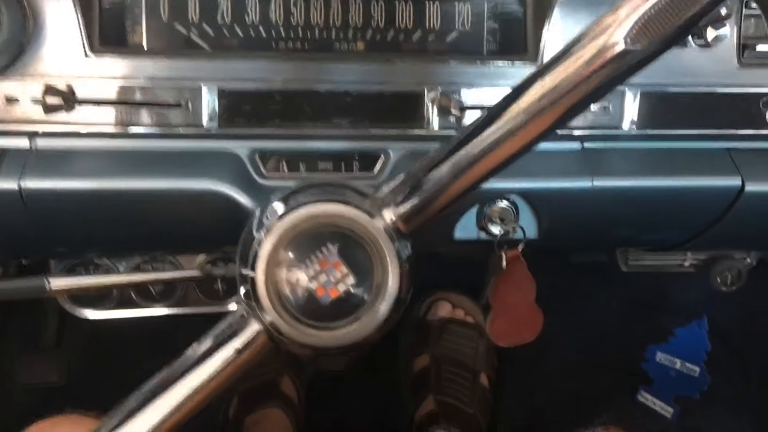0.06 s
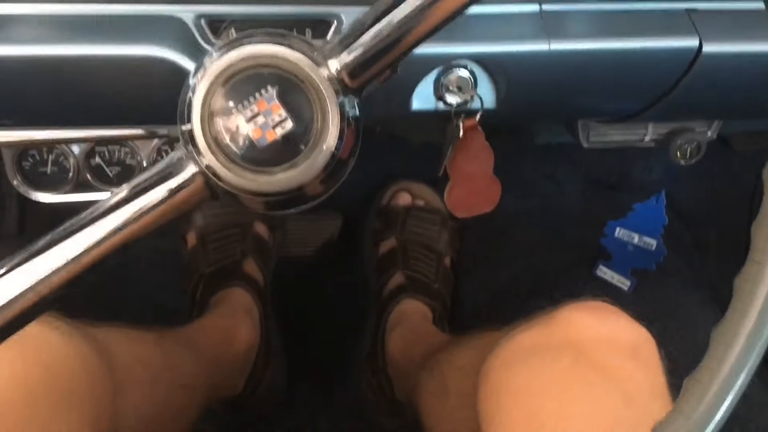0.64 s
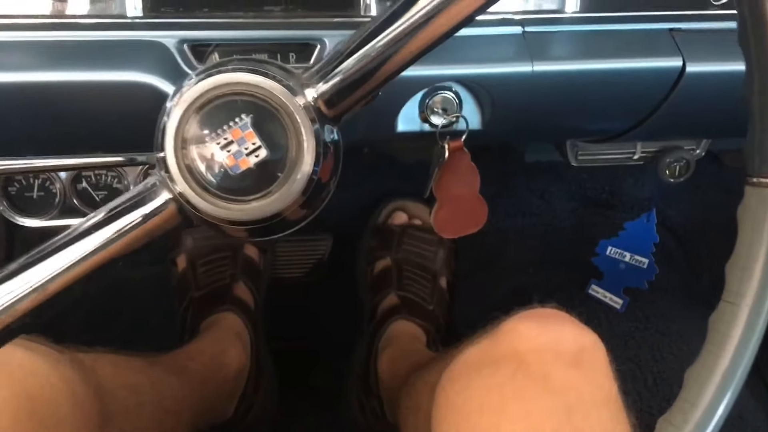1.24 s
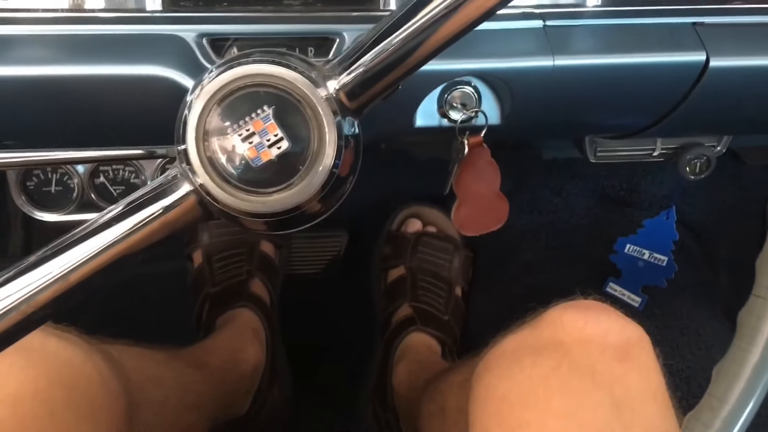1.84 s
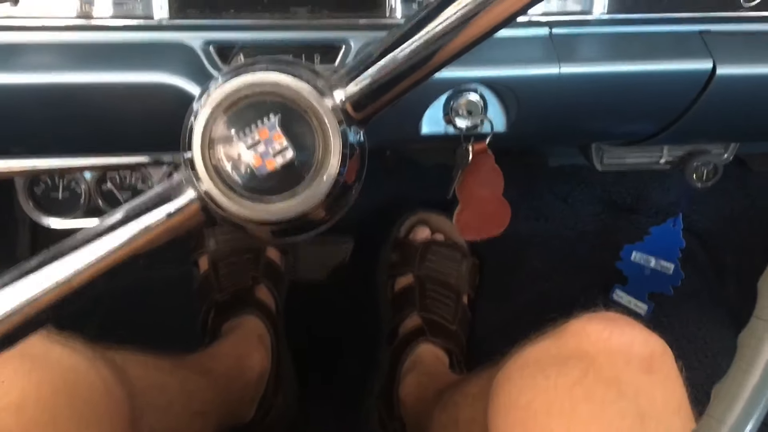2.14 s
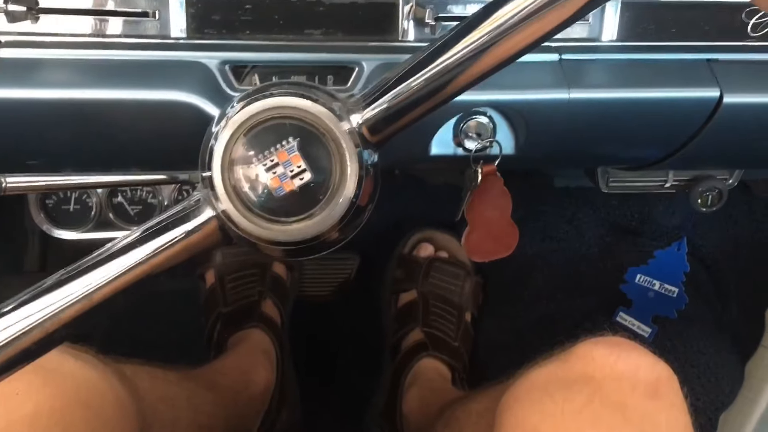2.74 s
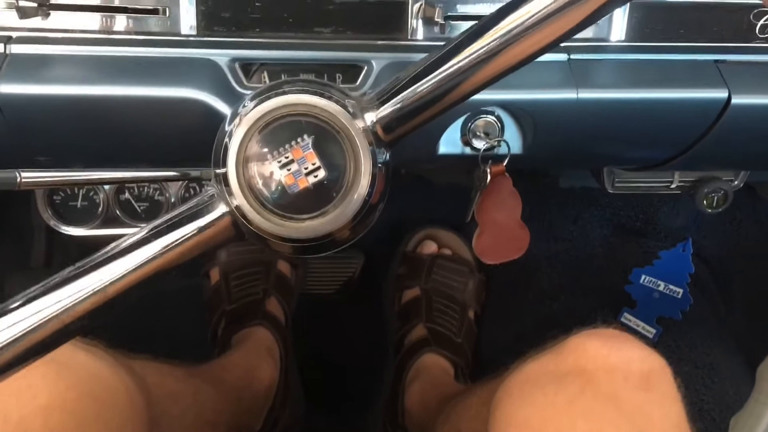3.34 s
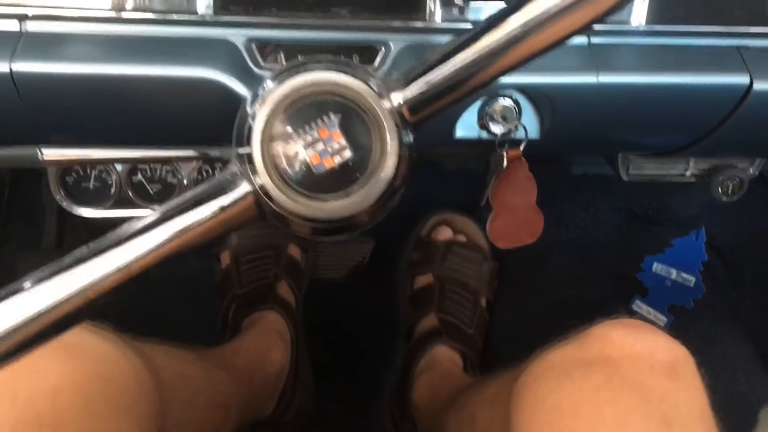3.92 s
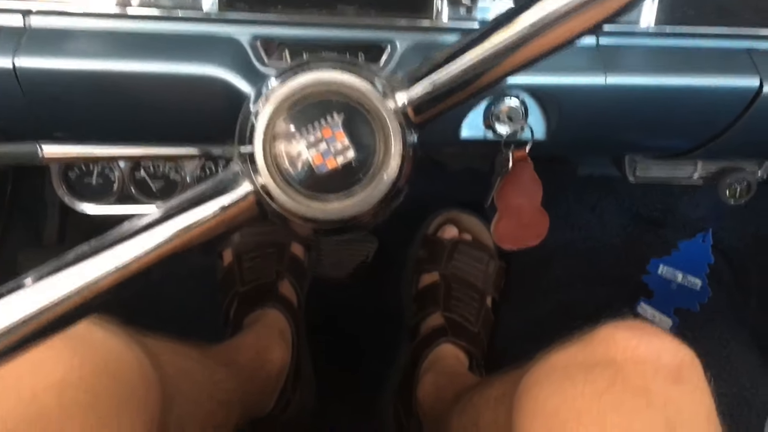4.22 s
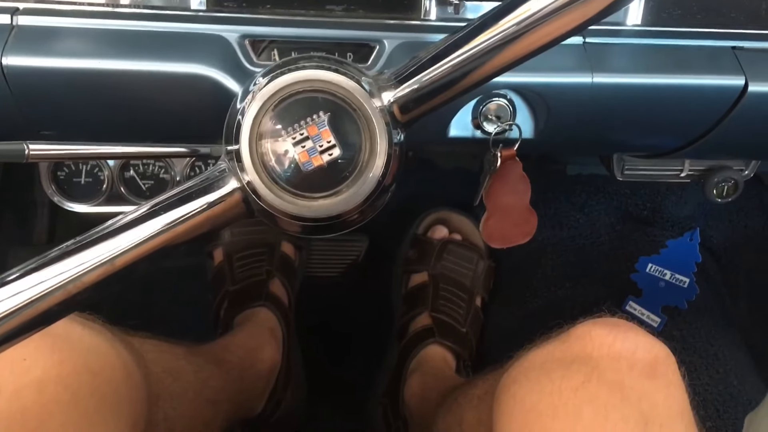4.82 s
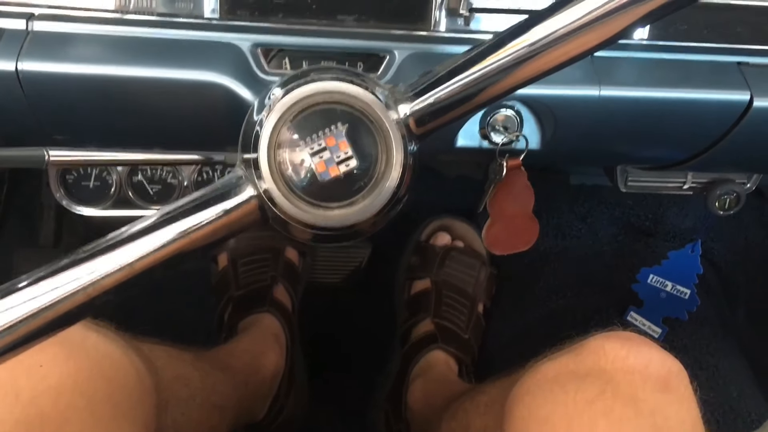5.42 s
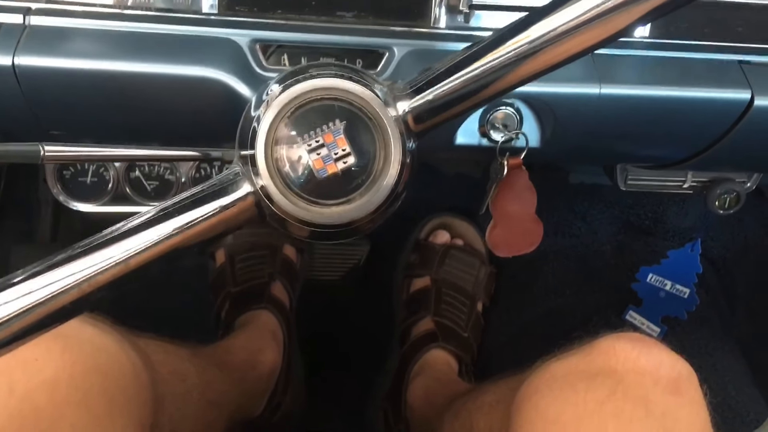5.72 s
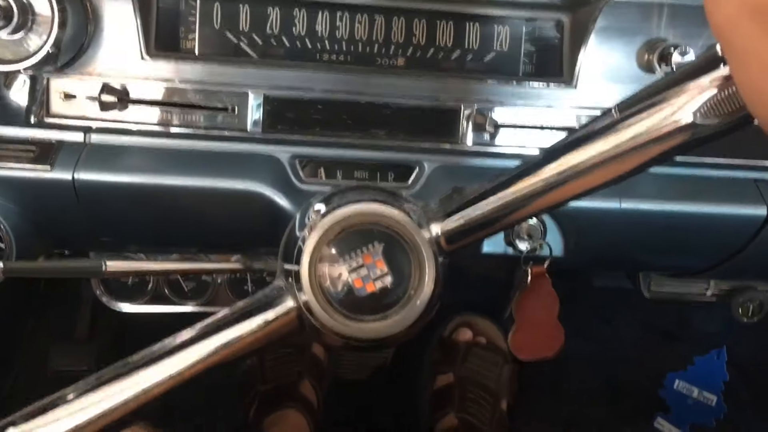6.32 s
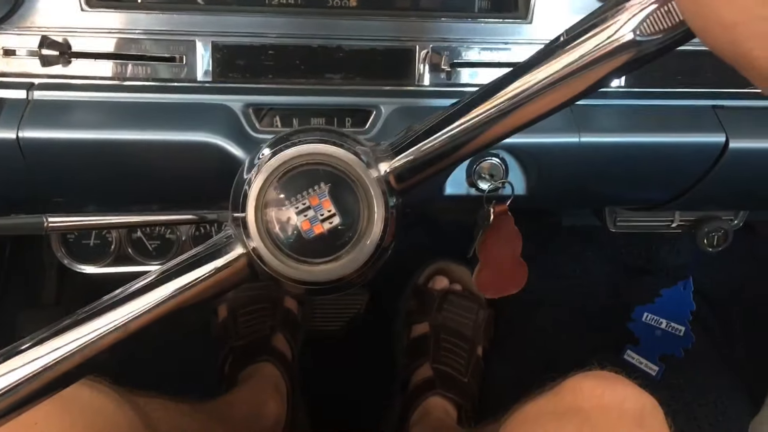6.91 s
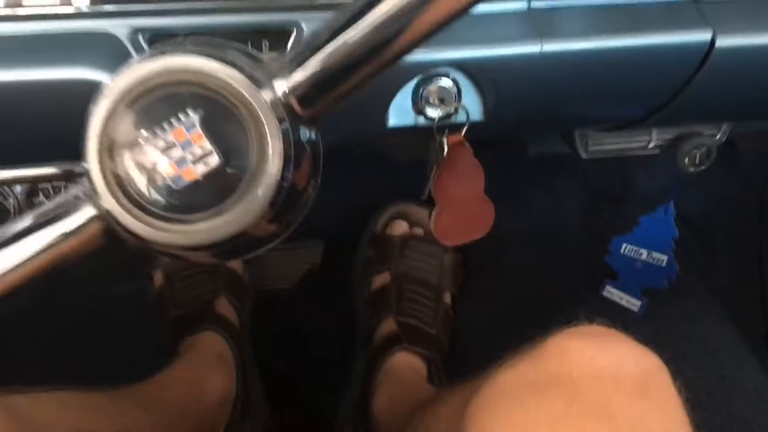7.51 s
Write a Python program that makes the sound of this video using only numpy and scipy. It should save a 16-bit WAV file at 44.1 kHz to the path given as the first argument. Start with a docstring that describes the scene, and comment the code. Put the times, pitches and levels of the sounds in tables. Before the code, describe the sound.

A large V8 petrol engine is heard close up from the driver's seat of an old car. It starts already revving, surges twice more, then sinks to a lumpy, stumbling cold idle. Another run of throttle blips follows, then two smaller ones. Each brings a deep boom and exhaust drone with a breathy gasp from the carburettor, over a rush of fan noise and a faint high hiss.

```python
"""The boom of a revving V8 fills the driver's seat, then sinks to a lumpy cold idle as the throttle
is blipped again and again. Uneven firings excite standing waves in the cabin and the exhaust pipe,
which boom, drone and bark. The carburettor gasps with the blips, and fan and valve gear rush with
the revs. Behind them air sizzles past the throttle plate, the linkage scrapes and the alternator
whines faintly. Engine speed is counted throughout in firings per second."""
import sys
import numpy as np
from scipy import signal
from scipy.fft import rfft, irfft
from scipy.io import wavfile
from scipy.ndimage import uniform_filter1d, minimum_filter1d

SR = 44100
rng = np.random.default_rng(int(sys.argv[2]) if len(sys.argv) > 2 else 0)


def transcribe(signal):
    """Save signal, clipped to [-1, 1], as a 16-bit WAV file at the path in sys.argv[1]."""
    frames = np.atleast_2d(signal).T
    limited = np.clip(frames, -1, 1)
    pcm = np.round(limited * 32767).astype(np.int16)
    wavfile.write(sys.argv[1], SR, pcm)


N = 337759
T = np.arange(N) / SR
HZ = np.fft.rfftfreq(N, 1 / SR)

# Levels in the tables are relative: each source adds its own gain.
# pedal presses (start [s], held [s], push [firings/s], gasp length [s], gasp level [dB])
BLIPS = [(-0.198, 0.29, 145.7, 0.14, -25), (0.601, 0.25, 187, 0.2, -27), (1.126, 0.332, 196, 0.22, -27),
         (2.452, 0.26, 121, 0.16, -29), (2.921, 0.33, 75.6, 0.18, -51), (3.212, 0.38, 131.3, 0.17, -30),
         (3.871, 0.189, 212, 0.12, -28), (5.392, 0.17, 121, 0.1, -31.5), (6.471, 0.35, 117, 0.18, -36.5)]
# hunting of the cold engine with the foot off (time [s], speed [firings/s])
IDLE_SPEED = [(0, 46.2), (0.65, 49.7), (2.15, 38.3), (2.5, 51.7), (4.8, 47.3), (5.2, 44.1), (5.45, 48.3),
              (6.15, 44.0), (6.4, 52.3), (7.4, 50.5), (7.66, 47.1)]
# the eight cylinders at the tailpipe at high revs, in firing order (level [dB])
CYLINDER_LEVELS = [3, 1, -1.5, -2.5, 0.5, -5, -2, -1]
# uneven burning: misfires dip, rich thumps swell (time [s], length [s], level [dB])
STUMBLES = [(.61, 0.12, -4), (1.06, 0.12, -2.5), (1.98, .07, -9.5), (2.14, 0.058, -11), (2.38, .06, 8),
            (2.44, .05, -10), (2.65, 0.068, 8), (2.94, 0.046, 4.5), (4.53, 0.058, 4.5), (4.59, .06, -11),
            (4.87, 0.067, 5.5), (5.0, 0.1, -4), (5.51, 0.048, 4.5), (5.64, 0.073, 9), (5.87, .06, 2),
            (6.07, 0.064, 8), (6.22, 0.11, 5.5), (6.39, 0.12, -5.5), (6.54, .07, 3), (6.76, 0.1, 2.5),
            (7.24, .12, -3), (7.4, 0.079, -6), (7.62, 0.064, 5.5)]
# exhaust with the throttle shut (speed [firings/s], boom [dB], drone [dB], bark [dB])
EXHAUST_BY_SPEED = [(45, -18.5, -32.5, -30), (59, -18.5, -30, -32), (71, -18, -26.5, -26.5),
                    (89.6, -20.5, -19.5, -30), (101.6, -17.5, -25.5, -28), (124, -21, -25, -23.5),
                    (141, -17, -18, -22), (150, -17.5, -23.5, -24), (167, -12.5, -24, -29.5)]
# plain firing note over the burble in the boom (speed [firings/s], level [dB])
NOTE_BY_SPEED = [(46, 8), (54, 7.5), (64, -1), (90, -10), (120, -25)]
# lowest standing waves of the cabin (frequency [Hz], bandwidth [Hz], level [dB])
BOOM_MODES = [(41.16, 11.9, 6), (57.15, 13.5, 6.5)]
# lowest standing wave of the pipe (frequency [Hz], bandwidth [Hz], level [dB])
DRONE_MODES = [(87, 12.7, 0)]
# upper standing waves of the pipe (frequency [Hz], bandwidth [Hz], idle [dB], high revs [dB])
BARK_MODES = [(141.1, 20, 1, 0), (183.2, 9.1, -9.5, 5), (197, 12.2, -3.5, -10.5)]
# floor panels shaken by the exhaust (frequency [Hz], bandwidth [Hz], level [dB])
FLOOR_MODES = [(232, 12.5, 1.5), (291.2, 29, 0), (348.6, 31, -11)]
# spectrum of air drawn through the open throttle (frequency [Hz], level [dB])
GASP_SPECTRUM = [(900, -28), (1600, -4), (2050, -3), (2550, -5.5), (3500, -2), (4900, -6.5), (5800, -2.5),
                 (7400, -2.5), (8300, -0.5), (9800, -1), (10500, -6), (10950, 0), (13000, -4), (15800, -10)]
# cavity resonances of the air cleaner (frequency [Hz], bandwidth [Hz], level [dB])
AIR_CLEANER_MODES = [(2100, 990, 1.5), (3520, 1300, -8.5), (5780, 2060, -1)]
# spectrum of fan and valve gear (frequency [Hz], level [dB])
RUSH_SPECTRUM = [(200, 1), (330, -4.5), (480, -14.5), (650, -11.5), (860, -13), (1050, -11), (1600, -14),
                 (2100, -14), (2500, -16.5), (3000, -19.5), (3600, -19.5), (5000, -25.5), (6500, -25.5),
                 (11000, -49)]
# fan and valve gear with the throttle shut (speed [firings/s], level [dB])
RUSH_BY_SPEED = [(46, -45.5), (60, -44), (88, -39.5), (125, -37), (166, -37.5)]
# bulkhead panels that ring in the rush (frequency [Hz], bandwidth [Hz], level [dB])
BULKHEAD_MODES = [(444, 80, -5.5), (582, 110, -5.5), (777, 74, -4.5), (976, 24, -19), (1326, 20, -32),
                  (2070, 48, -4)]
# spectrum of air leaking past the throttle plate (frequency [Hz], level [dB])
SIZZLE_SPECTRUM = [(1760, -21), (3000, -8), (3400, -3), (3900, -16), (4950, -13), (5250, -3.5), (7900, -2),
                   (9300, 1.5), (10500, 0.5), (11500, 3), (13800, -1.5), (15800, -3)]
# edge tones of the throttle plate (base frequency [Hz], bandwidth [Hz], level [dB])
EDGE_TONES = [(6570, 340, -60.5), (8720, 210, -57.5), (8780, 220, -59.5), (9800, 300, -58),
              (11040, 300, -60), (11460, 600, -64.5), (14500, 700, -66)]
# wander of the edge tones as the engine warms (time [s], pitch factor [ratio], level [dB])
WARMING = [(0, 1, -1), (2.8, 0.93, -1), (4.5, .998, 1.5), (6.9, 0.98, -0.5), (7.66, 1.004, 2.5)]
# clicks and squeaks of the throttle linkage (time [s], level [dB], frequency [Hz], decay [s])
LINKAGE_SCRAPES = [(.468, -36, 3730, 0.0066), (2.527, -43, 4520, 0.034), (6.56, -43.5, 3500, 0.14)]
# swells of the alternator whine (time [s], length [s], level [dB])
WHINE_SWELLS = [(3.6, .25, 6), (4.79, 0.16, 14.5), (6.25, 0.46, 17), (6.96, 0.21, 5.5), (7.5, .09, 19.5)]


def engine(manifold_s=.076, flywheel_s=.212, start_speed=142, full_push=107):
    """Inertia: the manifold charge lags the pedal, the flywheel the charge. Gives speed and load (0-1)."""
    pedal = sum(push * gate(start, held, rise=.145, fall=.074) for start, held, push, _, _ in BLIPS)
    charge = lagged(pedal, manifold_s, pedal[0])
    idle = curve(IDLE_SPEED)
    speed = idle + lagged(charge, flywheel_s, start_speed - idle[0])
    return speed, np.tanh(charge / full_push)


def firing_pulses(firings, speed, muffled=0.924):
    """A pulse train: the muffler evens out what all firings share, so their differences burble."""
    count = np.arange(1, int(firings[-1]) - 1)
    burn, late = rng.standard_normal((len(count), 2)).T * [[.24], [.025]]  # scatter of size and timing
    contrast = np.interp(np.interp(count, firings, speed), [52, 100], [.55, 1])  # less at idle
    size = amp(contrast * np.take(CYLINDER_LEVELS, count, mode="wrap")) * (1 + burn)
    onsets = np.minimum(np.searchsorted(firings, count + late), N - 1)
    pulses = np.zeros(N)
    pulses[onsets] = size - muffled * contrast * size.mean()
    return pulses


def exhaust_levels(firings, speed, load, overrun_speed=159):
    """Amplitude modulation: speed, load and uneven burning set the boom, drone and bark in dB."""
    cycle = np.cos(2 * np.pi * firings / len(CYLINDER_LEVELS))  # one throb in eight firings
    uneven_db = swells(STUMBLES) + 1.87 * drift(12.3) + 1.2 * cycle
    # the pipe barks as the revs fall through the overrun speed
    coasting = np.clip(-np.gradient(speed) * SR / 130, 0, 1)
    overrun_db = 12 * coasting * np.exp(-((speed - overrun_speed) / 8.4) ** 2)
    # it coughs just after each press, as the squirt of fuel burns
    cough_db = swells([(start + 0.084, 0.092, 2.5) for start, *_ in BLIPS])
    boom_db = by_speed(EXHAUST_BY_SPEED, speed, column=1) + 3.5 * load + uneven_db
    drone_db = by_speed(EXHAUST_BY_SPEED, speed, column=2) + 5 * load + 0.74 * uneven_db
    bark_db = by_speed(EXHAUST_BY_SPEED, speed, column=3) + 6 * load + 0.16 * uneven_db
    return boom_db, drone_db, bark_db + overrun_db + cough_db


def exhaust(firings, speed, load, floor_db=-45, gain_db=.5):
    """Forced resonance: pulses and turbulent gas drive the modes of cabin, pipe and floor."""
    turbulence = .18 * rng.standard_normal(N)
    drive = unit_rms(firing_pulses(firings, speed)) + turbulence
    boom_db, drone_db, bark_db = exhaust_levels(firings, speed, load)
    note = unit_rms(np.sin(2 * np.pi * firings + 0.25 * drift(19)))  # firings come early and late
    burble = steadied(ring(drive, BOOM_MODES), 0.082)
    boom = burble + amp(by_speed(NOTE_BY_SPEED, speed)) * note  # the note takes over at idle
    revs = np.clip((speed - 60) / 100, 0, 1)  # a faster blow-down favours the middle bark mode
    bark = sum(amp(idle_db + revs * (high_db - idle_db)) * resonate(drive, hz, width)
               for hz, width, idle_db, high_db in BARK_MODES)
    # the floor follows the bark only in part, and sluggishly
    shaking_db = 0.44 * uniform_filter1d(bark_db - bark_db.mean(), size=SR // 8)
    sound = amp(boom_db) * steadied(boom, 0.045)
    sound += amp(drone_db) * steadied(ring(drive, DRONE_MODES), 0.024)
    sound += amp(bark_db) * steadied(bark, 0.11)
    sound += amp(floor_db + shaking_db) * steadied(ring(drive, FLOOR_MODES), 0.062)
    rumble_cut = signal.butter(6, 31, "high", fs=SR, output="sos")
    return amp(gain_db) * signal.sosfiltfilt(rumble_cut, sound)


def carburettor(firings, load, delay_s=0.078, linger_s=0.17, gasp_gain_db=-1, hollow_gain_db=-8):
    """Turbulent intake gasps once the throttle is well open; cavity resonance adds a hollow swell."""
    airflow = sum(amp(db) * gate(start + delay_s, length, rise=0.071, fall=0.12) ** 2
                  for start, _, _, length, db in BLIPS)
    airflow += amp(-42) * lagged(load, 0.27, load[0])  # a little air keeps flowing while the revs die
    strokes = 1 + 0.037 * np.cos(2 * np.pi * firings) + 0.14 * drift(51)  # ripple of the intake strokes
    hiss = coloured(strokes * rng.standard_normal(N), GASP_SPECTRUM)
    gasp = uniform_filter1d(airflow, size=SR // 35) * hiss
    slow_draw = uniform_filter1d(airflow, int(linger_s * SR)) + amp(-39) * load ** 2
    hollow = slow_draw * unit_rms(ring(strokes * rng.standard_normal(N), AIR_CLEANER_MODES))
    return amp(gasp_gain_db) * gasp + amp(hollow_gain_db) * hollow


def fan_and_valves(firings, speed, load, load_db=5.5, gain_db=3):
    """Broadband noise grows with speed and load, throbs with the firings and excites bulkhead modes."""
    throb = 1 + 0.099 * np.cos(2 * np.pi * firings) + 0.071 * drift(49)
    rush = coloured(throb * rng.standard_normal(N), RUSH_SPECTRUM)
    level_db = by_speed(RUSH_BY_SPEED, speed) + load_db * load + gain_db
    return amp(level_db) * unit_rms(rush + ring(rush, BULKHEAD_MODES))


def throttle_leak(speed, load, sizzle_db=-46.3, flutter_db=2):
    """Jet noise: air sizzles past the throttle plate and sheds faint, wandering edge tones."""
    bend = curve(WARMING, column=1) - .012 * load  # the tones flatten under load
    tones = np.zeros(N)
    for hz, width, db in EDGE_TONES:
        pitch = hz * bend * (1 + 0.0081 * drift(5.7))
        strength = amp(db + flutter_db * drift(9.5))
        tones += strength * unit_rms(resonate(rng.standard_normal(N), pitch, width))
    tones_db = curve(WARMING, column=2) - 3 * np.log2(speed / speed.min())  # they fade as revs rise
    sizzle = amp(sizzle_db + 0.75 * drift(22)) * coloured(rng.standard_normal(N), SIZZLE_SPECTRUM)
    return sizzle + amp(tones_db) * tones


def linkage(width_hz=650):
    """Friction: decaying bursts of narrow-band noise as the pedal takes up its slack."""
    scrapes = np.zeros(N)
    for start, db, hz, decay in LINKAGE_SCRAPES:
        envelope = (T > start) * np.exp(-abs(T - start) / decay)
        scrapes += amp(db) * envelope * unit_rms(resonate(rng.standard_normal(N), hz, width_hz))
    return scrapes


def alternator(firings, speed, base_db=-60, doubling_db=6.5):
    """Phase modulation: belt slip, greater at high revs, wavers a whine at six times the firing rate."""
    slip = np.interp(speed, [55, 120], [.35, 1.1])
    phase = 2 * np.pi * 6 * firings + slip * drift(18)
    whine_db = base_db + doubling_db * np.log2(speed / 50) + swells(WHINE_SWELLS)
    return amp(whine_db - slip + 2.5 * drift(18)) * unit_rms(np.sin(phase))


def cabin_reflections(x, wet=0.27, t60_s=0.078):
    """Interference: early reflections from glass and dashboard ripple the spectrum."""
    t = T[:SR // 10]
    echoes = rng.standard_normal(len(t)) * amp(-60 * t / t60_s) * (t > .002)
    reflected = signal.oaconvolve(x, echoes / np.linalg.norm(echoes))[:N]
    return (x + wet * reflected) / np.hypot(1, wet)


def resonate(x, hz, width):
    """A damped resonator of gain 1 whose frequency may follow a curve."""
    carrier = np.exp(2j * np.pi * np.cumsum(hz * np.ones(N)) / SR)
    pole = np.exp(-np.pi * width / SR)
    return 2 * (carrier * signal.lfilter([(1 - pole) ** 2], [1, -2 * pole, pole ** 2], x / carrier)).real


def ring(x, modes):
    """Modal superposition: the sum of steady resonances driven by x."""
    return sum(amp(db) * resonate(x, hz, width) for hz, width, db in modes)


def coloured(x, spectrum):
    """Spectral shaping by (frequency [Hz], level [dB]) points, scaled to rms 1."""
    hz, db = np.transpose(spectrum)
    gain = amp(np.interp(np.log(HZ + 1), np.log(hz), db))
    return unit_rms(irfft(rfft(x) * gain, N))


def drift(hz):
    """Random fluctuation: noise low-passed at hz, rms 1."""
    return unit_rms(irfft(rfft(rng.standard_normal(N)) / (1 + (HZ / hz) ** 4), N))


def lagged(x, seconds, start):
    """First-order lag: relaxes towards x from a starting value."""
    keep = np.exp(-1 / (seconds * SR))
    return start + signal.lfilter([1 - keep], [1, -keep], x - start)


def gate(start, held, rise, fall):
    """Trapezoidal envelope: rises from start and falls once the held time is over."""
    return np.clip((T - start) / rise, 0, 1) * np.clip(1 - (T - start - held) / fall, 0, 1)


def swells(rows):
    """Gaussian bumps of level from rows of (time [s], length [s], level [dB])."""
    return sum(db * np.exp(-(2 * (T - centre) / length) ** 2) for centre, length, db in rows)


def curve(rows, column=1):
    """Linear interpolation of a table column over time."""
    rows = np.asarray(rows)
    return np.interp(T, rows[:, 0], rows[:, column])


def by_speed(rows, speed, column=1):
    """Linear interpolation of a table column over the firing rate."""
    rows = np.asarray(rows)
    return np.interp(speed, rows[:, 0], rows[:, column])


def steadied(x, seconds):
    """Normalisation to a running rms of 1, leaving the faster throb."""
    size = int(seconds * SR)
    power = uniform_filter1d(uniform_filter1d(x ** 2, size), size)
    return x / np.sqrt(abs(power) + 1e-20)


def unit_rms(x):
    """Normalisation to an overall rms of 1."""
    return x / np.sqrt(np.mean(x ** 2) + 1e-20)


def amp(db):
    """Decibels to amplitude ratio."""
    return 10 ** (np.asarray(db) / 20)


def scene():
    """Superposition: the sources of one engine, sharing its speed and load, add in a mono channel."""
    speed, load = engine()
    firings = np.cumsum(speed) / SR  # running count
    airy = fan_and_valves(firings, speed, load) + carburettor(firings, load)
    airy += throttle_leak(speed, load) + linkage()
    return (exhaust(firings, speed, load) + alternator(firings, speed) + cabin_reflections(airy))[None]


def record(dry, ceiling=.88, cutoff_hz=15830):
    """Peak limiting eases the tallest swells; a low-pass filter then bounds the treble."""
    safe_gain = np.minimum(1, ceiling / (abs(dry) + 1e-9))
    limited = dry * uniform_filter1d(minimum_filter1d(safe_gain, size=900), size=900)
    low_pass = signal.firwin(801, cutoff_hz, window=("kaiser", 9), fs=SR)
    return signal.oaconvolve(limited, low_pass[None], "same")


dry = scene()
out = record(dry)
transcribe(out)
```